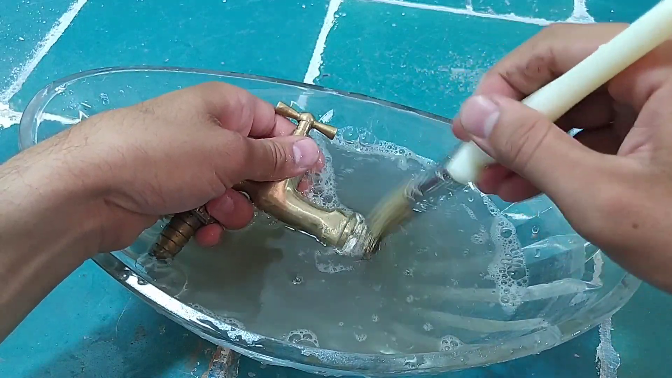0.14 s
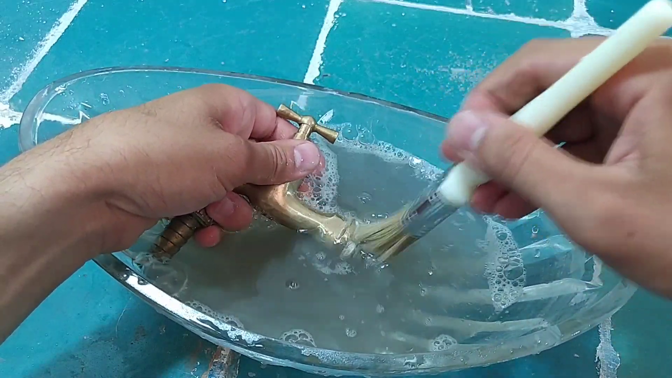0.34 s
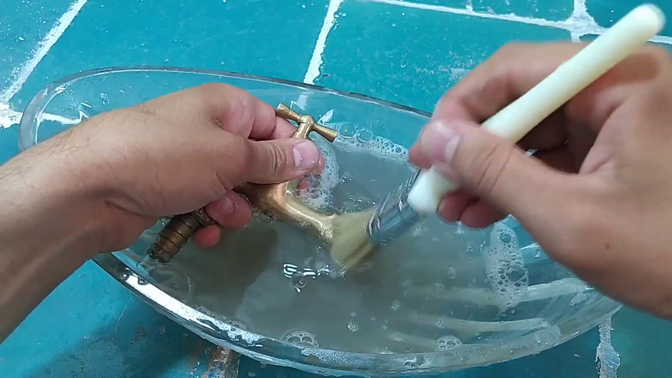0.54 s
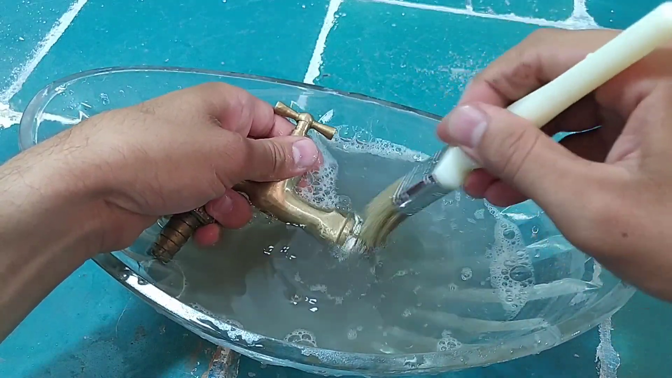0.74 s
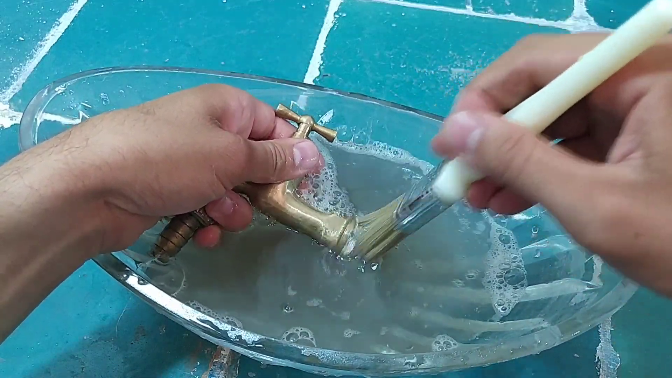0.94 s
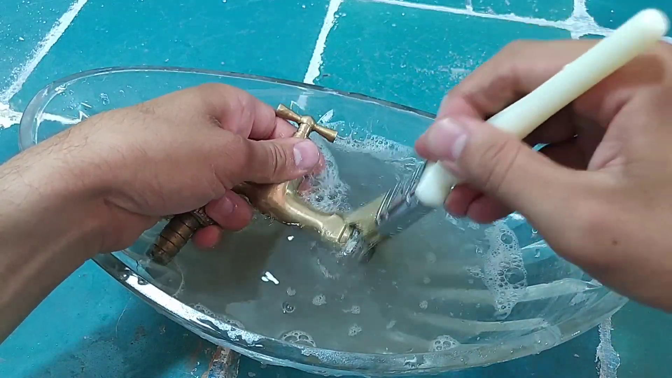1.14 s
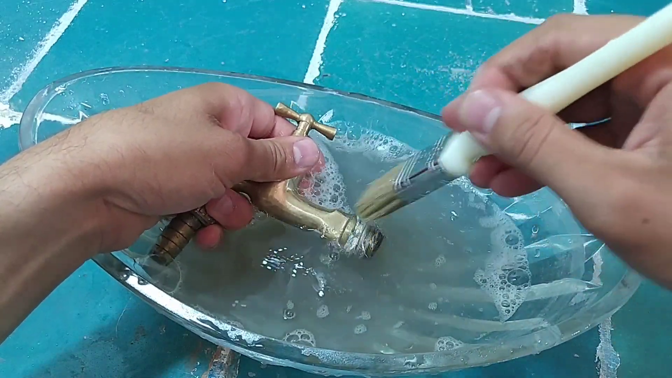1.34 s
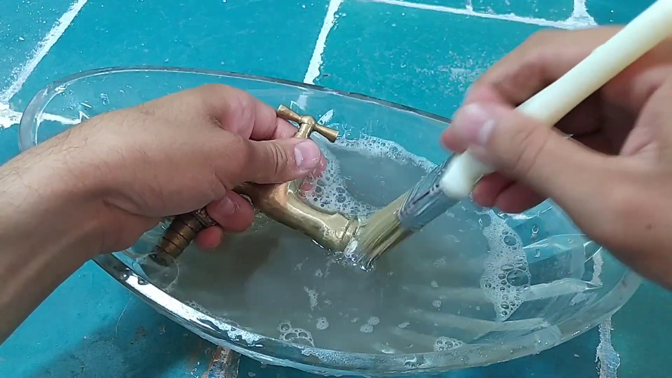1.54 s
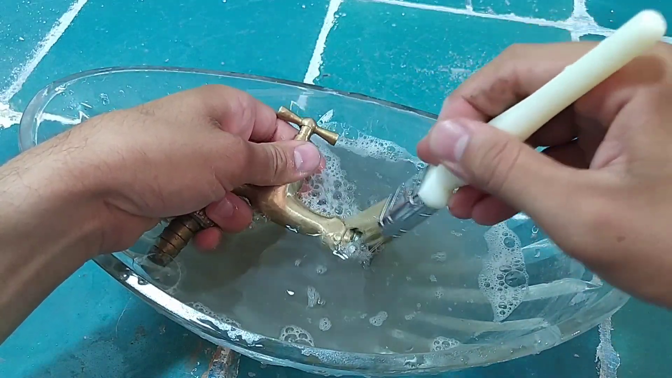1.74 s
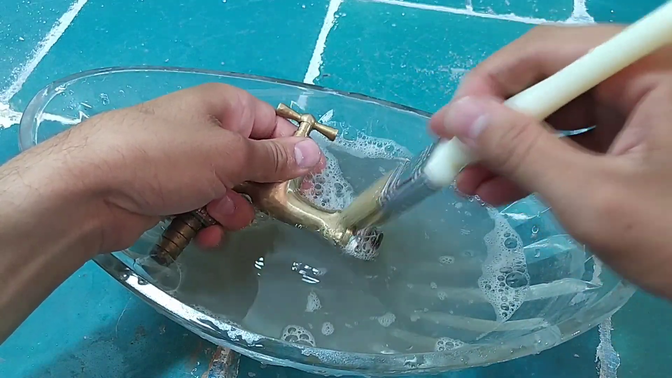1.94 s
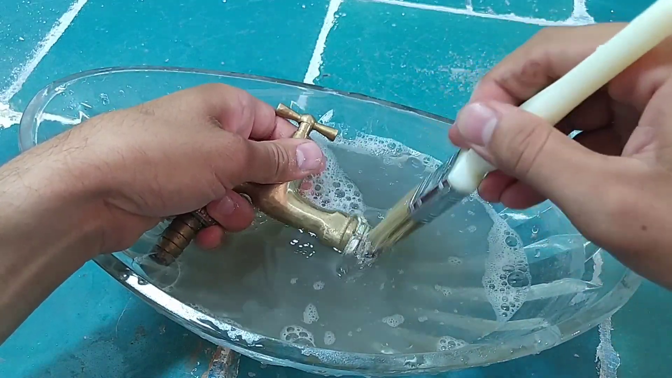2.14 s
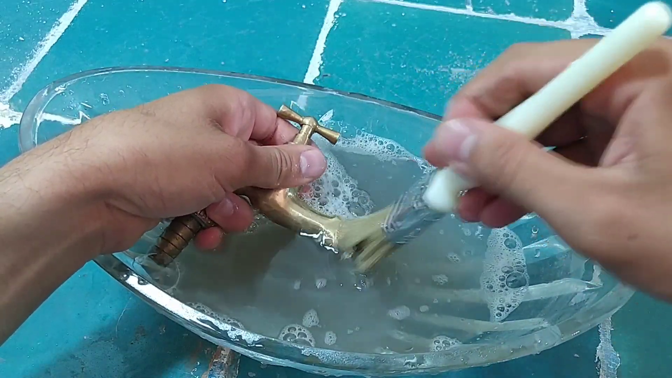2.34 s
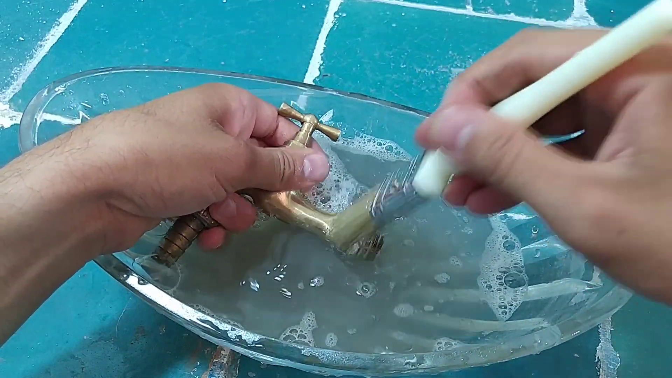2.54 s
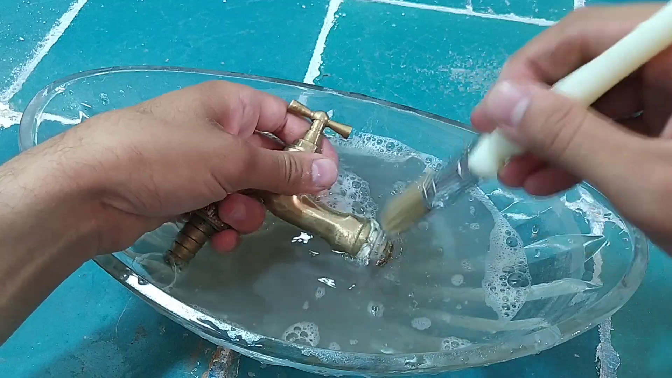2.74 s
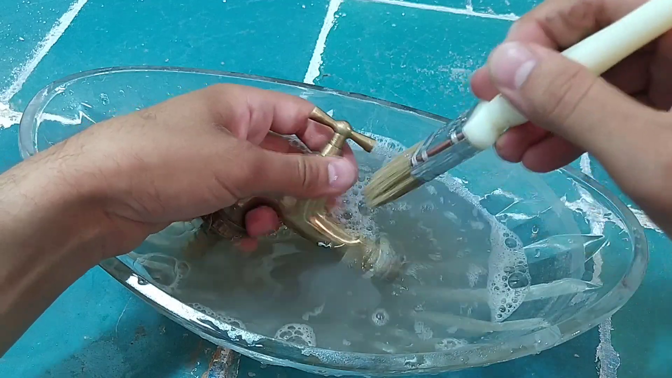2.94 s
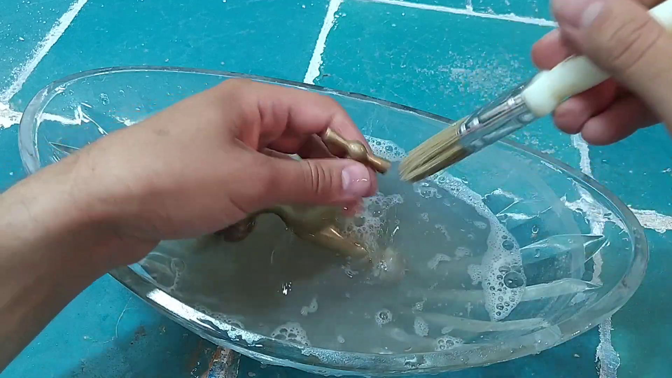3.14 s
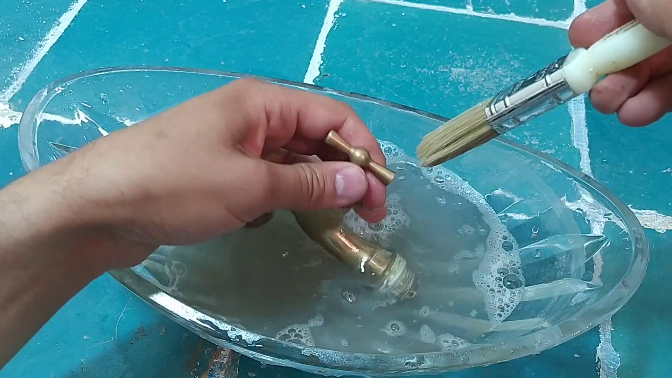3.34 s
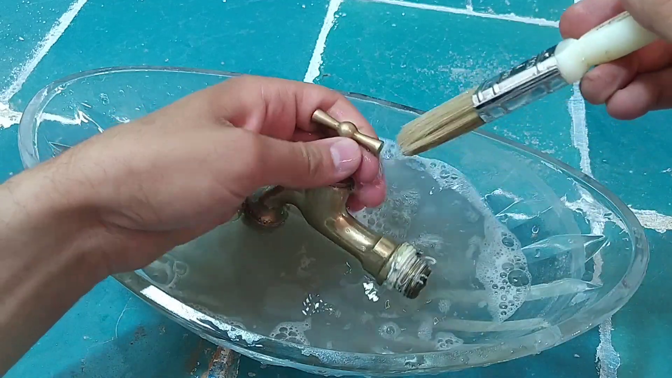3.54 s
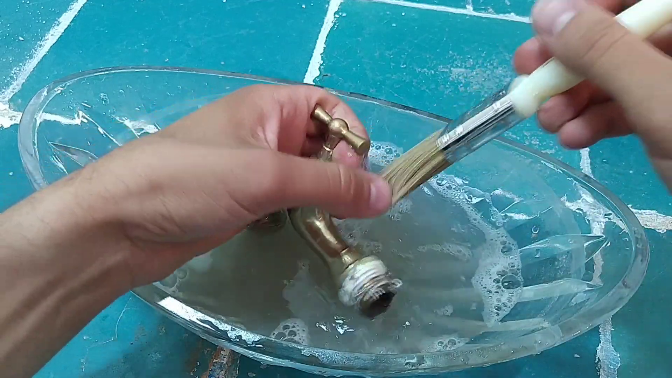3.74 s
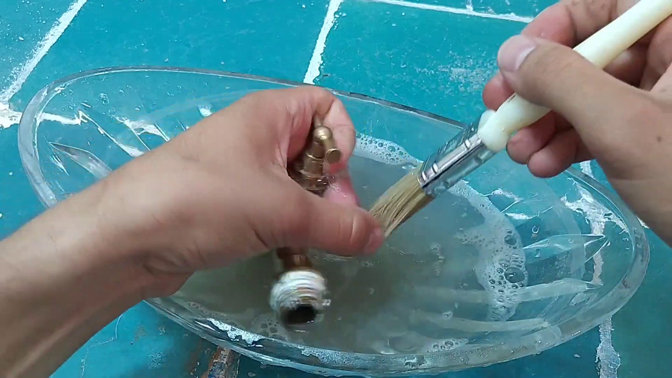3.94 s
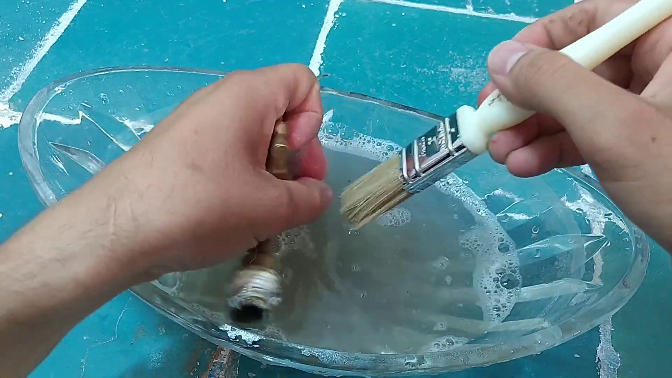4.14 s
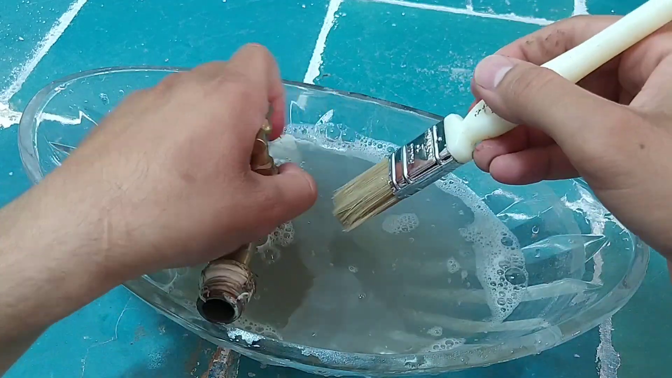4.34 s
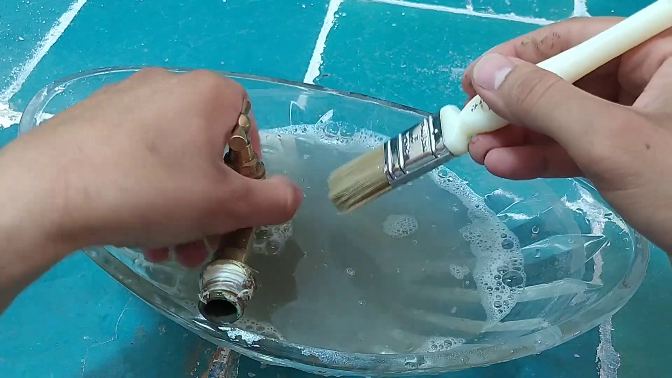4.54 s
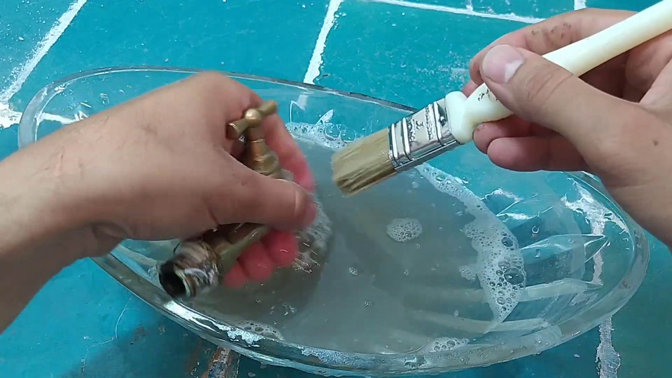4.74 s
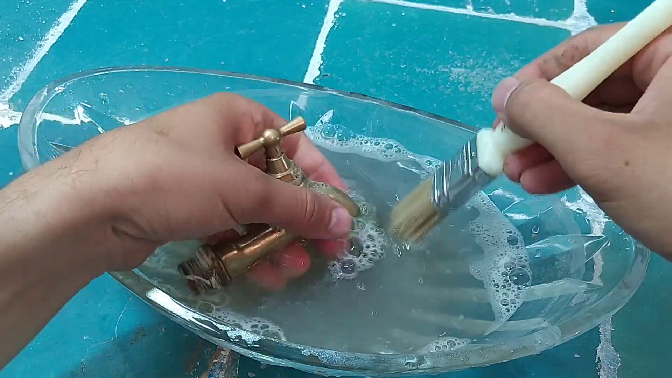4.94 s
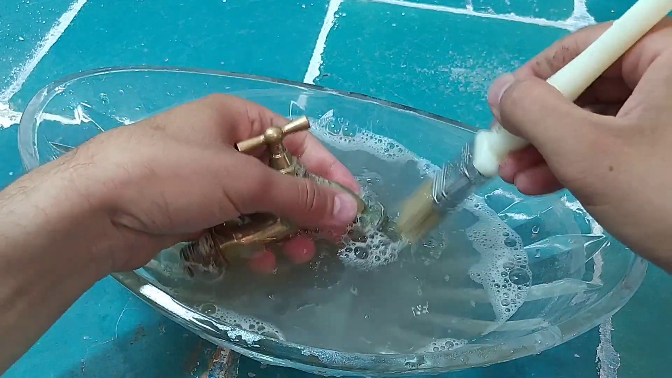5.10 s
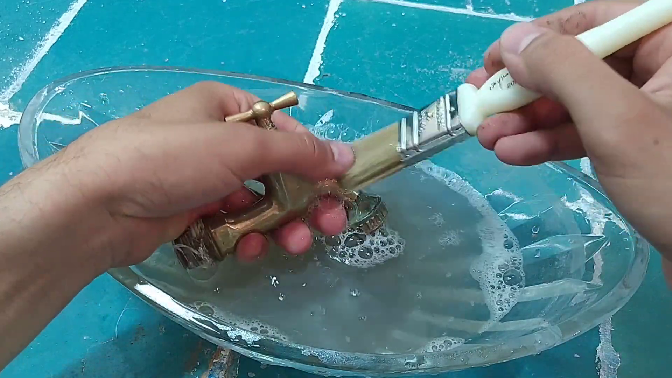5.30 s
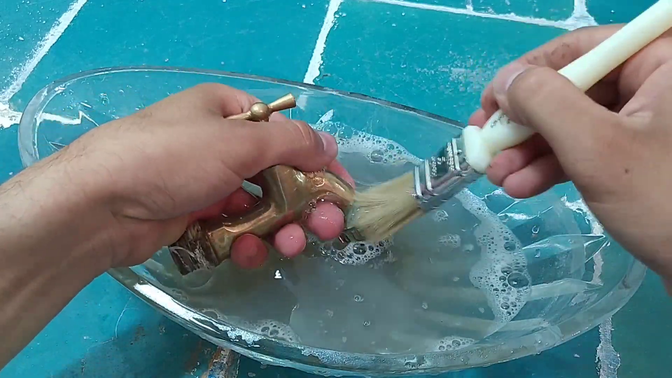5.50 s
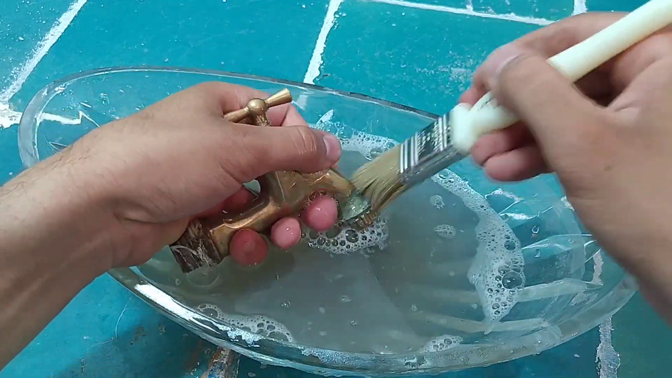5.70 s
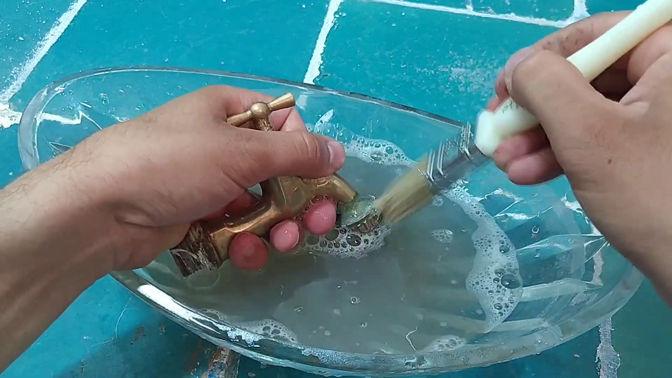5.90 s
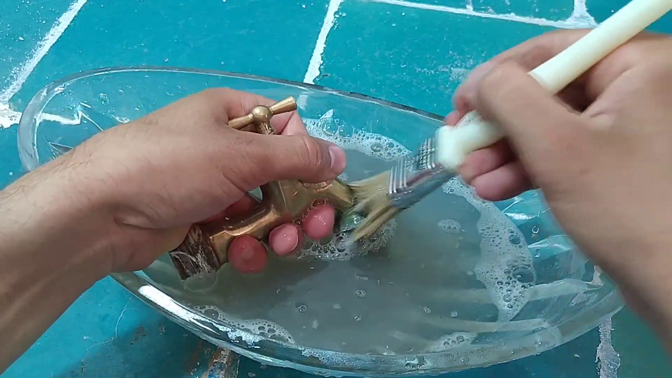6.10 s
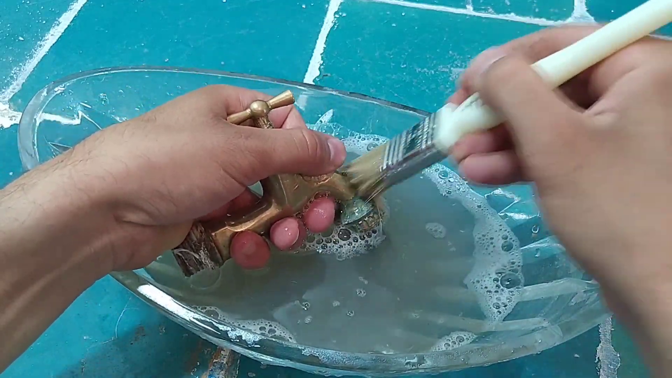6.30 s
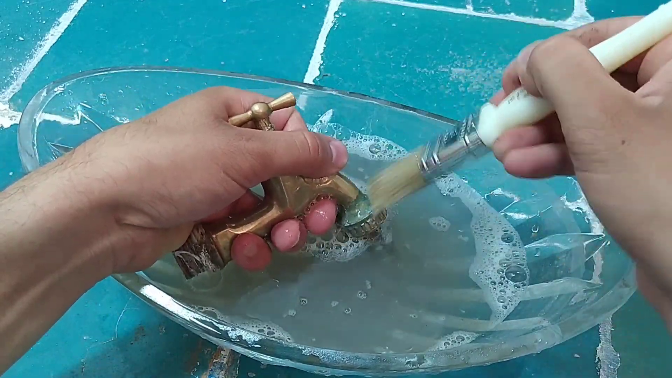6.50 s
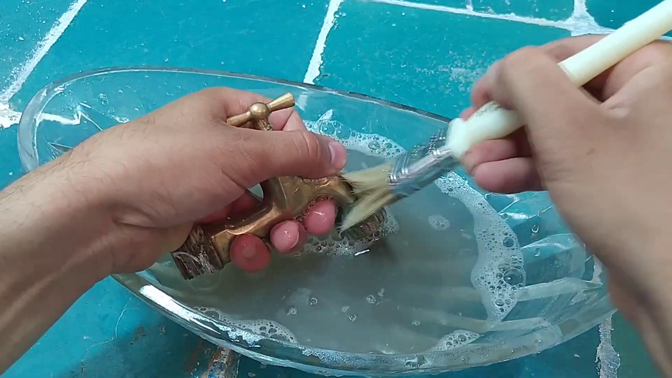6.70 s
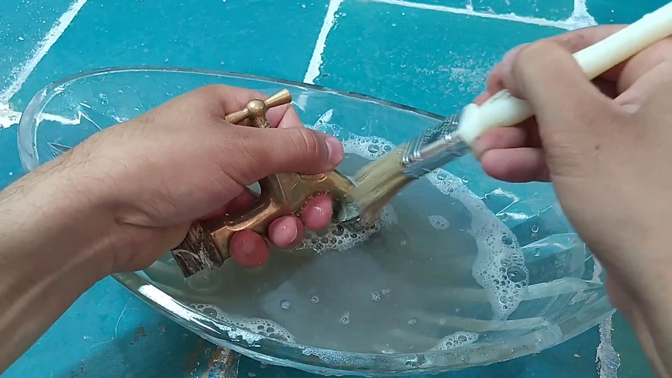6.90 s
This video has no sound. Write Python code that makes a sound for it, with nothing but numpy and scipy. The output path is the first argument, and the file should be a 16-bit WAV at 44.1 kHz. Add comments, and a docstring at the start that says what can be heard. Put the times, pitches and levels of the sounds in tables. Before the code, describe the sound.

Close by in a hard-walled room, soft scratchy brush strokes flick over wet brass above a bowl of soapy water. Midway the faucet is dipped and turned: small splashes, a jingling loose handle, then louder ringing clinks and a short scrape on the glass bowl. The brushing starts again, mixed with small dull taps on the metal, over a faint low hum.

```python
"""Scrubbing a brass faucet over a glass bowl

Wet bristles flick off the brass and burst the suds, over a bowl of soapy water in a hard-walled room.
Midway the faucet is dipped and turned: its loose handle chatters, and its knocks and scrapes excite
the normal modes of the glass. Then the brush drives the faucet's body. A faint hum lies beneath."""
import sys
import numpy as np
from scipy import signal
from scipy.fft import rfft, irfft
from scipy.io import wavfile
from scipy.ndimage import uniform_filter1d

SR = 44100
rng = np.random.default_rng(int(sys.argv[2]) if len(sys.argv) > 2 else 0)


def waveform_to_disk(signal):
    """Save audio, clipped to [-1, 1], as 16-bit WAV at the path in sys.argv[1]."""
    frames = np.transpose(np.atleast_2d(signal))
    scaled = np.clip(frames, -1, 1) * 32767
    samples = np.round(scaled).astype(np.int16)
    wavfile.write(sys.argv[1], SR, samples)


N = 311346
TIME = np.arange(N) / SR
RING_TIME = TIME[:SR // 2]


def amp(db):
    """Decibels as an amplitude ratio."""
    return 10 ** (np.asarray(db) / 20)


def unit_rms(x):
    """Normalisation to unit mean power."""
    return x / np.sqrt(np.mean(x ** 2) + 1e-20)


def curve_at(points, hz):
    """Interpolation on a logarithmic frequency axis."""
    f, value = np.transpose(points)
    return np.interp(np.log(hz + 1), np.log(f + 1), value)


def add(mix, s, sound):
    """Superposition: a stereo sound joins the mix at s seconds."""
    part = mix[:, max(round(s * SR), 0):][:, :sound.shape[1]]
    part += sound[:, :part.shape[1]]


def panned(x, left_db):
    """A level difference between the channels places a sound to one side."""
    return x * amp([[left_db / 2], [-left_db / 2]])


# Each row: frequency in Hz, correlation between left and right.
COHERENCE = [(25, .2), (70, .85), (330, .95), (800, .65), (1500, .3), (4000, .05), (12000, -.1)]
# Each row: frequency in Hz, left over right in dB.
BALANCE = [(60, -1), (200, -4), (380, -3), (700, -2.5), (1290, -2), (2400, 0), (4400, 0), (8100, -1.5),
           (15000, 1)]
def coloured(x, spectrum):
    """Partial coherence: two independent signals become a filtered stereo pair, alike in the bass."""
    hz = np.fft.rfftfreq(x.shape[1], 1 / SR)
    a, b = rfft(x) * amp(curve_at(spectrum, hz))
    coherence = np.clip(curve_at(COHERENCE, hz), -1, 1)
    lean = amp(curve_at(BALANCE, hz) / 2)
    mid, side = a * np.sqrt(1 + coherence), b * np.sqrt(1 - coherence)
    return unit_rms(irfft([(mid + side) * lean, (mid - side) / lean], x.shape[1]))


def grains(per_s, spread_db):
    """Shot noise: random impulses of uneven size, simultaneous in both channels."""
    size = amp(spread_db * np.minimum(rng.exponential(1, N), 4)) * (rng.random(N) < per_s / SR)
    return size * rng.standard_normal((2, N))


def flutter(hz, depth_db):
    """Random modulation: a gain that wanders through hz new values a second."""
    knots = np.clip(rng.standard_normal(4000), -2, 2)
    return unit_rms(amp(depth_db * np.interp(TIME * hz, np.arange(len(knots)), knots)))


def swells(rows, rest_db=-120, blunt=0, range_db=24, rise_share=0.7):
    """Incoherent swells add in power; each rises and falls evenly in dB, its top rounded by blunt."""
    t = TIME[::32]
    power = amp(rest_db) ** 2
    for s, db, length in rows:
        away = np.maximum((s - t) / rise_share, (t - s) / (1 - rise_share)) / length
        power = power + amp(db - range_db * np.hypot(away, blunt)) ** 2
    return np.interp(TIME, t, np.sqrt(power))


def impact(spectrum, bands, levels_db, lives_s, lags_s=None):
    """A brief contact is broadband: in each band a noise burst swells and dies, after an optional lag."""
    noise, out = coloured(rng.standard_normal((2, 4096)), spectrum), 0
    for band, db, life, lag in zip(bands, levels_db, lives_s, lags_s or np.zeros(len(bands))):
        t = np.maximum(TIME[:noise.shape[1]] - lag, 0)
        bandpass = signal.butter(3, band, "band", fs=SR, output="sos")
        burst = signal.sosfilt(bandpass, noise * np.sqrt(t) * np.exp(-t / life))
        out = out + amp(db) * unit_rms(burst)
    return out


def mode(hz, db, t60, left_db=0, phase=0, wander=1, size=None):
    """A damped oscillator, heard with a level and phase difference between the channels."""
    t = RING_TIME[:size]
    wave = (np.exp(2j * np.pi * hz * t) * np.exp(1j * np.array([[phase], [0]])) * wander).imag
    rise = np.tanh(t / .0008) ** 2
    return panned(wave, left_db) * (amp(db) * np.exp(-np.log(1000) * t / t60) * rise)


def resonate(x, modes):
    """Forced vibration: x drives a set of modes, and the result keeps the level of x."""
    response = sum(mode(hz, db, t60) for hz, db, t60 in modes)
    return np.std(x) * unit_rms(signal.fftconvolve(x, response, axes=1)[:, :N])


# Each row: frequency in Hz, reverberation time T60 in seconds.
ROOM_DECAY = [(150, 0.46), (400, 0.25), (1040, 0.32), (2760, 0.41), (7280, 0.27), (14000, 0.26)]
def in_room(x, wet_db):
    """Reverberation: sparse reflections of random sign, each band decaying at its own rate."""
    echoes = rng.choice([-1., 1.], (2, SR)) * (rng.random((2, SR)) < 3000 / SR)
    echoes = coloured(echoes, [(1, 0), (SR, 0)]) * (TIME[:SR] > .004)
    hz, t, spectra = signal.stft(echoes, SR, nperseg=256)
    decay = amp(-60 * t / curve_at(ROOM_DECAY, hz)[:, None])
    tail = signal.istft(spectra * decay, SR, nperseg=256)[1]
    return x + amp(wet_db) * signal.fftconvolve(x, tail / np.linalg.norm(tail[0]), axes=1)[:, :N]


# Room air. Each row: frequency in Hz, relative spectral density in dB.
AIR_SPECTRUM = [(12, -21.5), (20, 7), (35, 2.5), (66, -13), (112, -2.5), (161, -11), (289, -15),
                (1130, -27.5), (3080, -31), (6190, -34), (6720, -39), (7950, -35), (9130, -45.5),
                (15500, -58.5)]
# Each row: frequency in Hz, level in dB.
HUM_TONES = [(100, -74), (121, -75)]
def background(air_db=-62.5):
    """The noise floor: still room air and a faint hum, modulated in phase and amplitude."""
    air = amp(air_db) * coloured(rng.standard_normal((2, N)), AIR_SPECTRUM)
    hum = 0
    for hz, db in HUM_TONES:
        phase = 2 * np.pi * hz * TIME + 2 * flutter(hz=24.3, depth_db=10.5)
        hum = hum + amp(db) * np.sqrt(2) * np.sin(phase) * flutter(hz=6.8, depth_db=7)
    return air + hum


# Each row: centre in seconds, top pitch in Hz, relative level in dB, length in seconds.
WHISTLE_ARCS = [(2.965, 4040, -77, 0.22), (3.235, 4000, -77, 0.19)]
def whistles(sag_hz=754):
    """Frequency modulation: two faint, thin tones each arch up in pitch and down again."""
    out = np.zeros((2, N))
    for s, top_hz, db, length in WHISTLE_ARCS:
        arc = np.linspace(-1, 1, int(length * SR))
        pitch = top_hz - sag_hz * arc ** 2
        tone = np.sin(2 * np.pi * np.cumsum(pitch) / SR) * np.sqrt(1 - arc ** 2)
        add(out, s - length / 2, panned(amp(db) * tone, left_db=-21))
    return in_room(out * flutter(hz=149.5, depth_db=5), wet_db=-1)


# Each row: crest in seconds, relative level in dB, length in seconds.
WATER_WAVES = [(.03, -56, 0.78), (.77, -58.5, 0.12), (1.02, -61, 0.37), (3.25, -65.5, 1),
               (3.665, -53, 0.25), (4.84, -53, 0.17), (5.1, -59.5, 0.25)]
# Each row: frequency in Hz, relative spectral density in dB.
SLOSH_SPECTRUM = [(60, -25), (130, -9), (215, 0), (300, -4), (480, -14), (1000, -28), (2500, -48)]
def slosh(gain_db=2):
    """Surface waves on the stirred water lap as low, lumpy swells of noise."""
    lumps = flutter(hz=30, depth_db=2.5)
    lapping = coloured(rng.standard_normal((2, N)) * lumps, SLOSH_SPECTRUM)
    return amp(gain_db) * swells(WATER_WAVES, rest_db=-79) * lapping


# Each row: crest in seconds, level in dB, length in seconds.
SPRAYS = [(3.12, -58, 0.11), (3.22, -58.5, 0.093), (3.49, -58.5, 0.18), (3.632, -53.5, 0.039),
          (3.675, -56.5, 0.11), (3.8, -58, 0.028), (4.8, -51, 0.075)]
# Each row: frequency in Hz, relative spectral density in dB.
SPRAY_SPECTRUM = [(1200, -20), (3400, -3), (5000, 0), (6200, 0), (6900, -5), (8400, 11.5), (9800, 1),
                  (10500, -8), (12500, -10), (15500, -27)]
def splashes():
    """Droplet impacts merge into shot noise as the faucet dips and comes up dripping."""
    drops = coloured(grains(per_s=1500, spread_db=2.5), SPRAY_SPECTRUM)
    return in_room(drops * swells(SPRAYS), wet_db=0)


# Each row: start in seconds, initial pitch in Hz, level in dB.
AIR_POCKETS = [(0.195, 412, -46.5), (0.764, 290, -69), (1.248, 1610, -60), (7.028, 980, -61)]
def plops(life_s=0.0012, glide_per_s=6):
    """Bubble resonance: an air pocket closing under the brush rings briefly, rising in pitch."""
    out, t = np.zeros((2, N)), TIME[:4096]
    envelope = np.sqrt(t / life_s) * np.exp(1 - t / life_s)
    for s, hz, db in AIR_POCKETS:
        wave = np.sin(2 * np.pi * hz * (t + glide_per_s * t ** 2 / 2))
        add(out, s, panned(amp(db) * wave * envelope, left_db=-2))
    return in_room(out, wet_db=0.5)


# Each row: start in seconds, relative level in dB.
SPURTS = [(0.243, -51), (0.265, -56.5), (0.348, -68), (0.817, -64), (0.829, -58), (0.858, -69),
          (1.348, -51.5), (1.37, -62), (5.78, -63), (5.948, -53), (7.028, -52)]
# Each row: frequency in Hz, relative spectral density in dB.
SPURT_SPECTRUM = [(300, -15.5), (720, -22), (900, 4.5), (1100, -5.5), (1500, -8), (2200, -15), (3200, -28),
                  (9000, -28), (15000, -42)]
def squelches(gain_db=-11, life_s=0.0057):
    """Flow noise: suds are squeezed out of the bristles in short wet spurts."""
    out, t = np.zeros((2, N)), TIME[:4096]
    for s, db in SPURTS:
        noise = coloured(rng.standard_normal((2, len(t))), SPURT_SPECTRUM)
        add(out, s, amp(db + gain_db) * unit_rms(noise * np.sqrt(t) * np.exp(-t / life_s)))
    return in_room(out, wet_db=-9)


# Shifts of grip. Each row: start in seconds, relative level in dB, settling time in seconds.
HANDLE_JOGS = [(3.033, -43.5, 0.1), (3.078, -47.5, 0.2), (3.44, -54.5, 0.25), (3.495, -46.5, 0.17),
               (3.53, -49, 0.073), (3.64, -56.5, 0.31), (3.985, -54, 0.28), (4.115, -58, 0.8),
               (4.225, -45, 0.23), (4.51, -53.5, 0.12), (4.585, -53.5, 0.068), (4.79, -51.5, 0.22),
               (5.0, -49.5, 0.12), (5.06, -57, 0.21)]
def jogs(rise_s=0.008, fall_db=36):
    """Exponential decay: each jog of the handle starts suddenly and settles; overlaps add in power."""
    t, power = TIME[::32], 0
    for s, db, settle_s in HANDLE_JOGS:
        age = np.maximum(t - s, 0)
        power = power + (np.minimum(age / rise_s, 1) * amp(db - fall_db * age / settle_s)) ** 2
    return np.interp(TIME, t, np.sqrt(power))


# Modes of the handle and of its stem. Each row: frequency in Hz, relative level in dB, T60 in seconds.
HANDLE_MODES = [(3560, -12.5, .03), (7730, -6, 0.029), (8180, 10.5, 0.013), (8660, 5.5, 0.018),
                (9000, 0.5, 0.019), (9350, 0, 0.036)]
STEM_MODES = [(3440, -26.5, 0.089), (3630, -22.5, .1)]
# The handle strikes its stem. Each row: start in seconds, frequency in Hz, level in dB.
STEM_STRIKES = [(3.0335, 8620, -24.5), (3.079, 8700, -34), (3.127, 8600, -41), (4.161, 8370, -44)]
# Fingers on brass. Each row: frequency in Hz, relative spectral density in dB.
RUB_SPECTRUM = [(1500, -0.5), (3400, -1.5), (5000, -0.5), (7000, -3.5), (8400, 5), (9600, -1.5),
                (10400, -10), (12500, -8.5), (15500, -42.5)]
# Each row: hardest push in seconds, relative level in dB, length in seconds.
FINGER_SLIDES = [(2.97, -65.5, 0.89), (3.27, -63.5, 0.98)]
def handle(jiggle_db=-5, rub_db=-9, slide_db=-1, ping_t60=0.015):
    """Rattling: tiny impacts excite the loose handle's modes, while wet fingers add friction noise."""
    jiggles = 0
    for row in HANDLE_MODES:
        hits = grains(per_s=70, spread_db=1)
        jiggles = jiggles + signal.oaconvolve(hits, mode(*row), axes=1)[:, :N]
    rub = coloured(grains(per_s=2300, spread_db=2.5), RUB_SPECTRUM)
    sound = (amp(jiggle_db) * unit_rms(jiggles) + amp(rub_db) * rub) * jogs()
    sound += amp(slide_db) * rub * swells(FINGER_SLIDES)
    for s, hz, db in STEM_STRIKES:
        stem = sum(mode(stem_hz, db + stem_db, t60, left_db=2) for stem_hz, stem_db, t60 in STEM_MODES)
        add(sound, s, mode(hz, db, ping_t60, left_db=-4.5, phase=0.83) + stem)
    return panned(in_room(sound, wet_db=-3), left_db=-3)


# Each row: hardest push in seconds, relative level in dB, length in seconds.
DRAGS = [(4.814, -36.5, 0.0614), (4.838, -30.5, 0.075), (4.89, -37.5, 0.035)]
# The bowl under the dragged faucet. Each row: frequency in Hz, relative level in dB, T60 in seconds,
# left over right in dB, phase lead of the left in radians.
DAMPED_BOWL_MODES = [(508, -14, 0.12, -5, 1), (895, -11.5, .04, -3.5, 1.5), (1336, -5.5, .1, 5.5, -2),
                     (2250, -10.5, .14, 0, 0.2), (3420, -22, .08, 1, 2.5)]
def scrape(rasp_db=-9):
    """Stick-slip friction: wet brass dragged over the glass drives modes that the contact also damps."""
    slips = unit_rms(grains(per_s=6000, spread_db=0)) * swells(DRAGS)
    spectrum = [(80, -18), (300, -5), (500, 14.5), (900, 6), (1400, -0.5), (2000, -8.5), (2700, -2),
                (4500, -16.5), (9000, -30.5), (14000, -54)]  # Hz, dB
    rasp, glass = coloured(slips, spectrum), 0
    for hz, db, t60, left_db, phase in DAMPED_BOWL_MODES:
        driven = signal.fftconvolve(slips[:1], mode(hz, 0, t60, left_db, phase), axes=1)[:, :N]
        glass = glass + amp(db) * unit_rms(driven)
    return np.std(slips) * in_room(amp(rasp_db) * rasp + glass, wet_db=-4.5)


def sway(rate_hz, depth, size=None, onset_s=0.026):
    """Moving water and reflections modulate a ring: it starts pure, then wanders in level and phase."""
    t = RING_TIME[:size]
    knots = rng.standard_normal((2, 200)) + 1j * rng.standard_normal((2, 200))
    wander = np.array([np.interp(t * rate_hz, np.arange(len(k)), k) for k in knots])
    share = depth * np.tanh(t / onset_s)
    return (1 + share * wander) / np.sqrt(1 + share ** 2)


def flex(clack_db, hz=1620, half_width_s=0.00088, above_clack_db=16):
    """Flexure: the struck glass bends in one dry pulse, a few cycles under a bell-shaped envelope."""
    t = TIME[:176] - .002
    pulse = np.cos(2 * np.pi * hz * t) * np.exp(-(t / half_width_s) ** 2)
    return panned(amp(clack_db + above_clack_db) * pulse, left_db=0)


# Thud, knock, clack, clink and tick. Each row: lower and upper edge in Hz.
IMPACT_BANDS = [(70, 450), (450, 1150), (1150, 2100), (2100, 7000), (7000, 16000)]
# Dispersion: low bending waves travel slowly and arrive late. Each entry: a band's lag in seconds.
IMPACT_LAGS = [.005, .003, 0, 0.00039, 0]
# The low, middle and high mode, each a close pair. Each row: frequency in Hz, relative level in dB,
# T60 in seconds, left over right in dB, phase lead of the left in radians, then the twin's offset
# in Hz, its offset in dB and its T60 in seconds.
BOWL_MODES = [(553, -3.5, 0.62, -6, 1.5, -8.5, -23, 1.1), (1299.6, -0.5, 0.52, 1, 0, -0.5, -16.5, 1.1),
              (2283, -5, 0.35, -2, 1.1, 13.5, -21.5, 1)]
# Each row: frequency in Hz, relative level in dB, T60 in seconds.
BOWL_OVERTONES = [(860, -12, 0.4), (1343, 5.5, 0.11), (1570, -5, 0.23), (1677, -9.5, 0.26),
                  (1850, -14.5, 0.17), (2440, -1, 0.16), (2460, -2, 0.14), (2631, -2, 0.17),
                  (3266, 0, 0.18), (3334, 10.5, 0.16), (3350, 2.5, 0.38), (3450, -10.5, .14),
                  (4200, -3, 0.31), (4798, -3.5, 0.33), (4790, -7, 0.24), (5470, -9.5, 0.22),
                  (5640, -8.5, .14), (6310, -5.5, 0.2), (6440, -7.5, .14), (7600, 4.5, 0.2),
                  (8100, -6.5, 0.11), (8635, -9, .2), (9540, -0.5, 0.28)]
# Each row: start in seconds, five band levels in dB, drive of the three main modes and of the overtones
# in dB, shifts of the middle and high mode with the water level in Hz, the middle mode's added phase
# lead in radians, the high mode's added left over right in dB, time until damping in seconds.
BOWL_KNOCKS = [(3.0341, -59.5, -60.5, -52, -51.5, -66, -55.5, -54.5, -43, -5, -2.5, -17, 4.5, 4, 0.39),
               (3.3545, -49.5, -39, -52.5, -49, -53.5, -49.5, -30, -57.5, -6.5, 3.5, -11, -2, -5.5, 0.56),
               (3.9756, -53, -49.5, -57.5, -56.5, -48, -72, -52.5, -50, -5, -0.5, -4, -2.5, -4.5, 0.29),
               (4.1937, -46, -35, -34.5, -42.5, -48, -26, -24.5, -14.5, 0.5, 6.5, 0, -3, -6.5, 0.14),
               (4.3042, -62, -46.5, -43, -52.5, -56.5, -34, -39, -21.5, -1.5, 1.5, -3, 2.5, -8, 0.012),
               (4.3282, -50.5, -48, -41, -48.5, -52.5, -42.5, -38.5, -28.5, -1.5, -4, -9.5, -1.5, -1.5, 0.048),
               (4.3619, -52, -41, -33, -37.5, -47.5, -58, -39.5, -17.5, -1, 38, -10.5, -2.43, 1, 0.21),
               (4.376, -55, -44, -47.5, -51.5, -56.5, -46.5, -35, -17.5, 2.5, 41.5, -12, -2.46, -2, 0.049),
               (4.9075, -50, -38, -46, -57.5, -66.5, -36.5, -24, -28.5, -1, 15.5, -17.5, -2, -0.5, 0.21),
               (5.0306, -52.5, -43.5, -53.5, -50.5, -55.5, -47, -38.5, -54, -13, -13.5, -14, -2.5, -9, 0.23)]
def knocks(ring_db=4, overtone_db=1, damp_s=0.06, uneven_db=5.5):
    """Impact excitation: where brass lands sets the bowl's mix of modes; a touch damps the main ones."""
    contact, glass = np.zeros((2, N)), np.zeros((2, N))
    lives_s = [0.0086, 0.0015, 0.0027, 0.0026, 0.0026]
    for row in BOWL_KNOCKS:
        s, band_dbs = row[0], row[1:6]
        low_db, middle_db, high_db, shimmer_db = row[6:10]
        middle_shift, high_shift, middle_rad, high_left_db, hold_s = row[10:]
        add(contact, s - .001, impact(KNOCK_SPECTRUM, IMPACT_BANDS, band_dbs, lives_s, IMPACT_LAGS))
        add(contact, s - .001, flex(clack_db=band_dbs[2]))
        build_up = np.tanh(RING_TIME / 0.003)
        damping = np.exp(-np.maximum(RING_TIME - hold_s, 0) / damp_s)
        landing = [(low_db, 0, 0, 0), (middle_db, middle_shift, 0, middle_rad),
                   (high_db, high_shift, high_left_db, 0)]
        for (drive_db, shift, lean, turn), pair in zip(landing, BOWL_MODES):
            hz, db, t60, left_db, phase, offset, twin_db, twin_t60 = pair
            main = mode(hz + shift, db, t60, left_db + lean, phase + turn, sway(rate_hz=34, depth=.22))
            twin = mode(hz + shift + offset, db + twin_db, twin_t60, left_db + lean, phase + turn)
            add(glass, s, amp(ring_db + drive_db) * (main + twin) * build_up * damping)
        for hz, db, t60 in BOWL_OVERTONES:
            side, phase, luck, detune = rng.standard_normal(4)
            band_db = next(level for level, (_, top) in zip(band_dbs, IMPACT_BANDS) if hz < top)
            level_db = db + overtone_db + shimmer_db + band_db + uneven_db * luck
            pitch = hz * (1 + .003 * detune)
            wander = sway(rate_hz=140, depth=1.5, size=12000)
            add(glass, s, mode(pitch, level_db, t60, 2 * side, 2 * phase, wander, size=12000))
    return in_room(contact, wet_db=-7.5) + glass


# The hand-damped faucet body. Each row: frequency in Hz, relative level in dB, T60 in seconds.
BRASS_MODES = [(947, 9, 0.0057), (1470, -7, 0.0066), (3430, -3.5, 0.033), (3540, -1, 0.018),
               (4250, 2, 0.016), (5660, -14, 0.025), (6320, 1.5, 0.045)]
# Each row: start in seconds, relative level in dB, hardness as a tilt toward the treble in dB.
LIGHT_TAPS = [(2.79, -64.5, 0), (3.6101, -63, -21), (3.6669, -58, 10), (4.578, -58, -4), (4.739, -73, -13),
              (5.981, -56.5, 11.5), (6.2365, -52, 7), (6.341, -59.5, 11), (6.537, -58, 1.5),
              (6.5684, -60, 9), (6.6717, -53.5, 10.5), (6.8941, -60, 14), (6.9185, -61, 16),
              (6.9695, -59, 6)]
# Each row: frequency in Hz, relative spectral density in dB.
TAP_SPECTRUM = [(100, -3), (250, 1.5), (500, 16), (700, 4.5), (920, 13), (1200, 1.5), (2200, -5),
                (3400, -2.5), (6500, -9.5), (9000, 4.5), (11000, -9.5), (15500, -17)]
def taps(brass_db=-8):
    """Damped impacts: brush and fingers bump the hand-held faucet; harder contacts are brighter."""
    out = np.zeros((2, N))
    bands_hz = [(70, 1150), (1150, 3800), (3800, 16000)]
    for s, db, hard_db in LIGHT_TAPS:
        levels = [db - 5.5 - hard_db / 2, db - 10.5, db - 13.5 + hard_db / 2]
        add(out, s - .001, impact(TAP_SPECTRUM, bands_hz, levels, lives_s=[.0099, .0082, .0049]))
    return in_room(out + amp(brass_db) * resonate(out, BRASS_MODES), wet_db=-4.5)


# Each row: frequency in Hz, relative spectral density in dB.
BRISTLE_SPECTRUM = [(410, -49), (700, -23), (910, -7), (1150, -18), (2950, -17), (4080, -14), (4640, -16.5),
                    (5290, -8.5), (5790, -9.5), (6940, -6.5), (8200, -1), (8900, 1), (9400, 1.5),
                    (10200, -5.5), (11400, -12), (14200, -15), (15500, -28.5)]
# Each row: start in seconds, level of the top band in dB.
TUFT_SNAPS = [(0.2588, -64.5), (0.82, -59.5), (1.243, -72), (1.39, -67), (1.976, -65), (2.6464, -66),
              (2.782, -67)]
def snaps(life_s=0.00096):
    """Elastic release: a bent tuft of bristles springs off the rim of the spout."""
    out = np.zeros((2, N))
    for s, db in TUFT_SNAPS:
        add(out, s - .001, impact(BRISTLE_SPECTRUM, IMPACT_BANDS[-2:], [db - 8, db], [life_s, life_s]))
    return in_room(out, wet_db=-10)


def bubbles(per_s, low_hz, high_hz, cycles=8, pitches=16, range_db=12):
    """Cavity resonance: each tiny soap bubble bursts with a short ring at its own pitch."""
    out, t = np.zeros((2, N)), TIME[:400]
    for hz in np.geomspace(low_hz, high_hz, pitches):
        pop = np.sin(2 * np.pi * hz * t) * np.exp(-t * hz / cycles)
        for when, size, side in rng.random((int(per_s * N / SR / pitches), 3)):
            add(out, when * N / SR, np.outer([side, 1 - side], pop) * amp(range_db * size ** 2))
    return unit_rms(out)


def drifting(x, depth_db):
    """Time-varying filtering: the spectrum drifts as other tufts and films of water take their turn."""
    spectra = signal.stft(x, nperseg=512)[2]
    patches = uniform_filter1d(rng.standard_normal(spectra.shape[1:]), 7, axis=0)  # about 600 Hz wide
    patches = uniform_filter1d(patches, 8, axis=1)  # about 45 ms long
    gain = unit_rms(amp(depth_db * unit_rms(patches)))
    return signal.istft(spectra * gain, nperseg=512)[1][:, :N]


# Each row: hardest push in seconds, relative level in dB, length in seconds.
BRUSH_STROKES = [(.01, -61.5, 0.47), (.18, -67, 0.19), (.262, -53.5, 0.14), (.53, -57.5, 0.22),
                 (.72, -56, 0.1), (.845, -52.5, 0.13), (.96, -61.5, 0.22), (1.03, -64, 0.24),
                 (1.128, -59, 0.061), (1.185, -61.5, 0.13), (1.362, -54, 0.125), (1.395, -62, 0.056),
                 (1.668, -59.5, 0.3), (1.982, -61.5, 0.29), (2.19, -59, 0.33), (2.28, -57.5, 0.14),
                 (2.35, -63.5, 0.069), (2.428, -58.5, 0.17), (2.535, -52.5, 0.14), (2.76, -60.5, 0.29),
                 (2.805, -56.5, 0.092), (5.395, -60, 0.14), (5.595, -56, 0.087), (5.697, -57.5, 0.3),
                 (5.78, -58, 0.13), (5.86, -61, 0.15), (5.92, -58, 0.23), (6.022, -53, 0.11),
                 (6.16, -63, 0.37), (6.255, -54, 0.13), (6.32, -58.5, 0.35), (6.44, -57.5, 0.16),
                 (6.61, -56.5, 0.25), (6.71, -57.5, 0.1), (6.84, -60.5, 0.48), (6.915, -51, 0.11),
                 (7.025, -57.5, 0.33)]
def brush(rasp_db=3.5, brass_db=-16, suds_db=-8.5, froth_db=-7, body_from_s=5.95):
    """Friction noise: bristles flick off wet brass and burst suds; late strokes ring the faucet's body."""
    pressure = swells(BRUSH_STROKES, rest_db=-83.5, blunt=0.15)
    clumps = flutter(hz=60, depth_db=2.3) * flutter(hz=300, depth_db=1.5)  # wet bristles let go in tufts
    flicks = unit_rms(grains(per_s=6100, spread_db=1.5) * clumps) * pressure
    rasp = amp(rasp_db) * np.std(flicks) * coloured(flicks, BRISTLE_SPECTRUM)
    body = amp(brass_db) * resonate(flicks * (TIME > body_from_s) * unit_rms(pressure), BRASS_MODES)
    suds = amp(suds_db) * bubbles(per_s=450, low_hz=3200, high_hz=8000) * pressure
    froth = amp(froth_db) * bubbles(per_s=350, low_hz=7600, high_hz=10300, cycles=20) * pressure
    return in_room(drifting(rasp + body + suds + froth, depth_db=3), wet_db=-2.5)


def scene():
    """Superposition of the sources at the bowl and the room behind them."""
    scrubbing = brush() + snaps() + squelches() + plops() + taps()
    turning = knocks() + scrape() + handle()
    return scrubbing + turning + splashes() + whistles() + slosh() + background()


def record(dry, edge_hz=15700):
    """Band limiting: the recorder acts as a steep low-pass filter."""
    lowpass = signal.firwin(511, edge_hz, window=("kaiser", 9), fs=SR)
    return signal.oaconvolve(dry, lowpass[None], "same")


# Brass on glass. Each row: frequency in Hz, relative spectral density in dB.
KNOCK_SPECTRUM = [(50, -35), (100, -1.5), (170, -11.5), (280, 0), (500, -9), (950, -1.5), (1200, -13),
                  (1450, -1.5), (1680, 1.5), (1860, -6), (2080, -35), (2600, -4), (2950, -22.5), (3350, -8),
                  (3800, -20), (4200, -14.5), (4800, -14.5), (5400, -20.5), (6300, -17.5), (6900, -23),
                  (8000, -15.5), (9700, -17.5), (10500, -31), (13000, -40.5), (15500, -63.5)]

dry = scene()
out = record(dry)
waveform_to_disk(out)
```